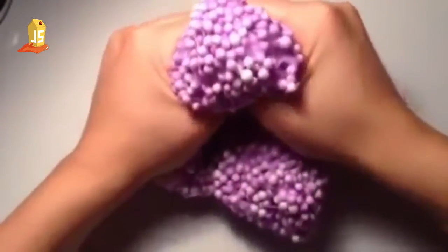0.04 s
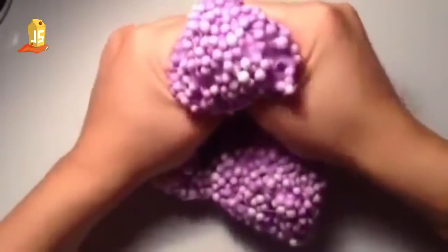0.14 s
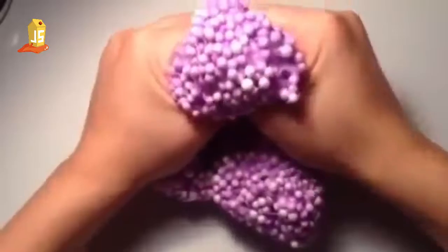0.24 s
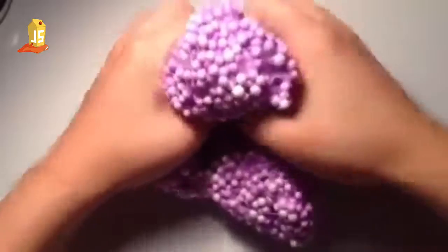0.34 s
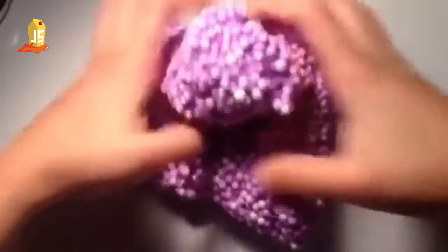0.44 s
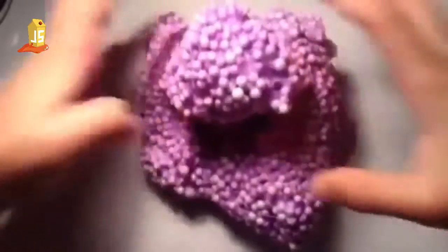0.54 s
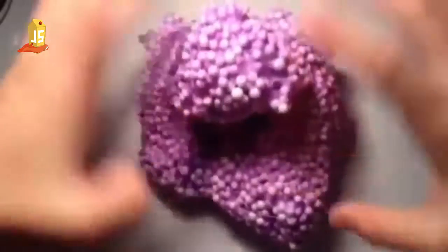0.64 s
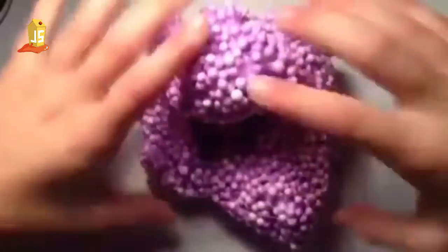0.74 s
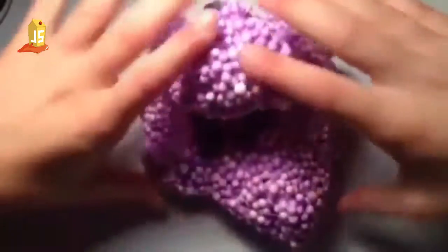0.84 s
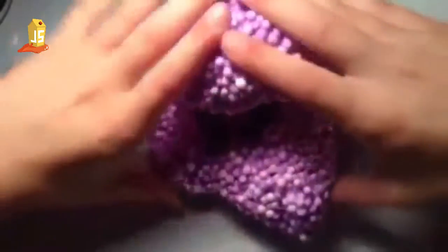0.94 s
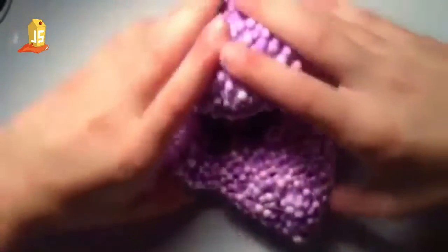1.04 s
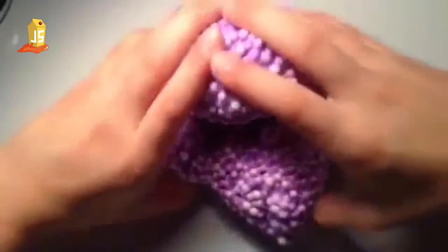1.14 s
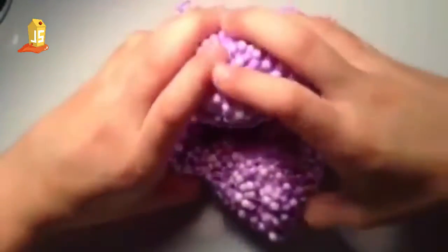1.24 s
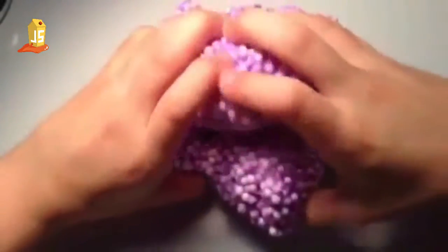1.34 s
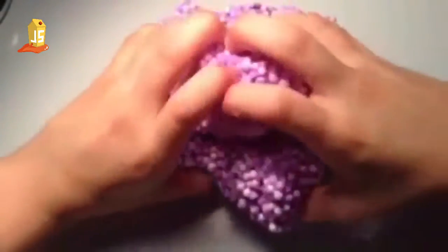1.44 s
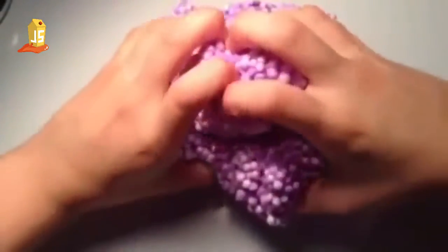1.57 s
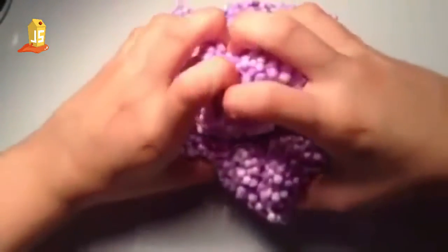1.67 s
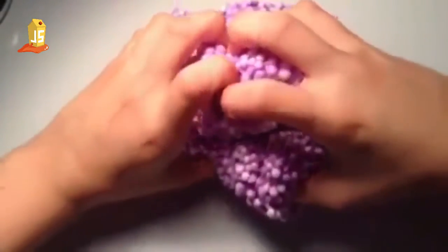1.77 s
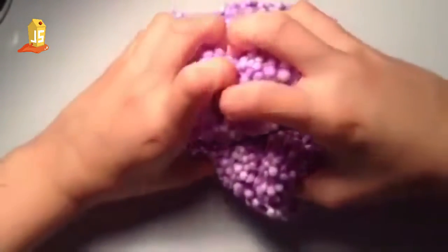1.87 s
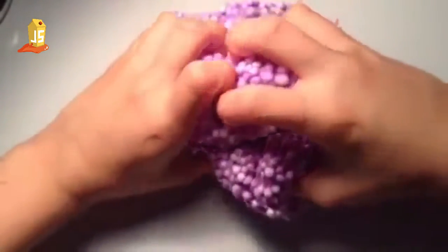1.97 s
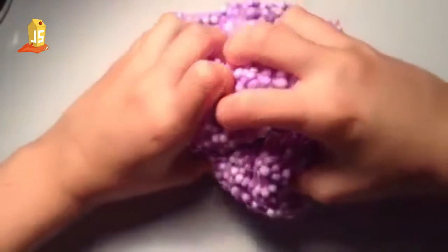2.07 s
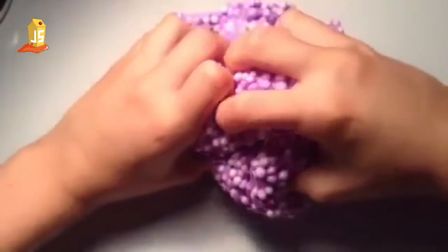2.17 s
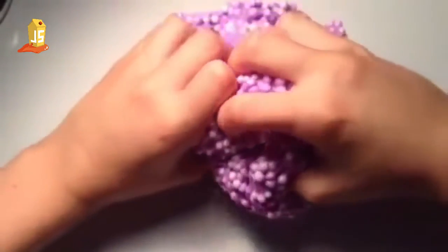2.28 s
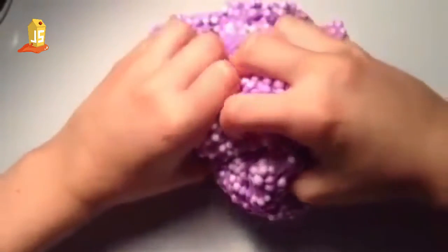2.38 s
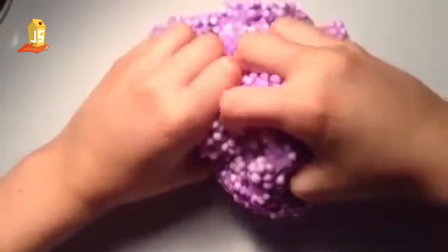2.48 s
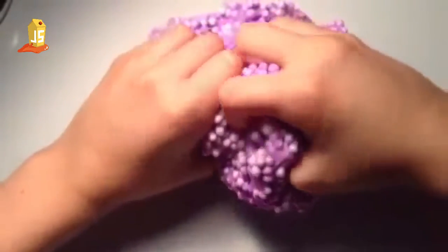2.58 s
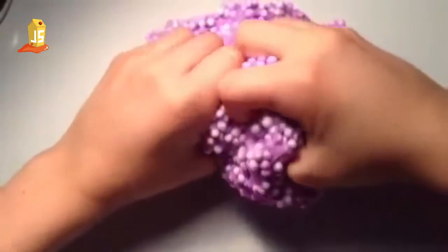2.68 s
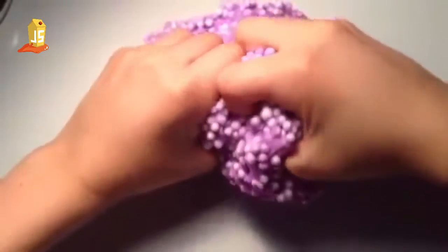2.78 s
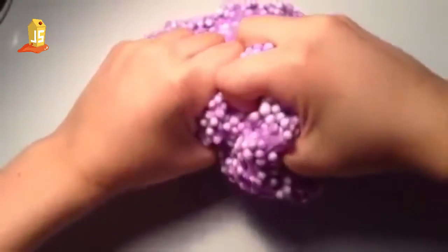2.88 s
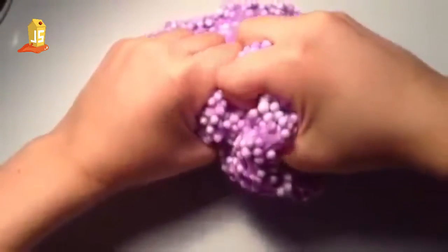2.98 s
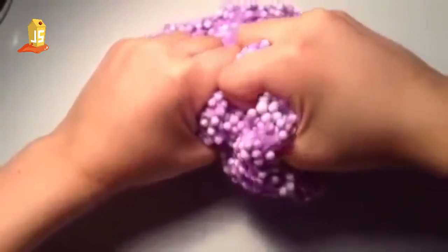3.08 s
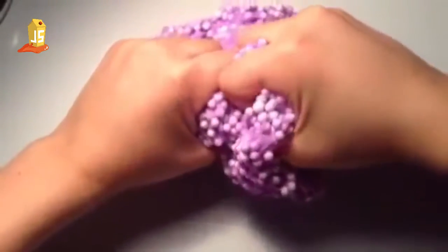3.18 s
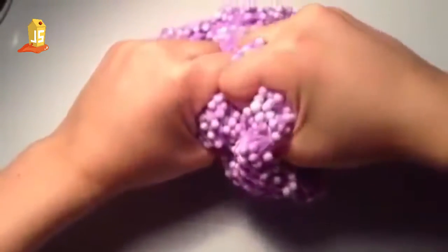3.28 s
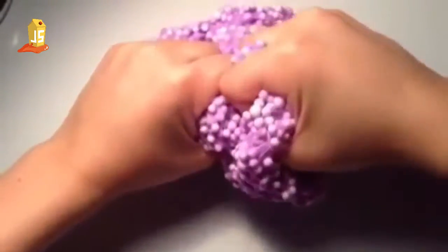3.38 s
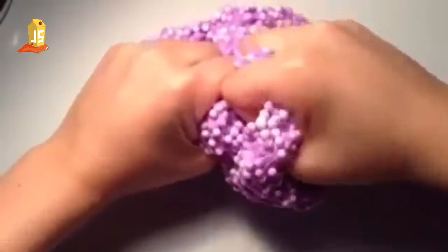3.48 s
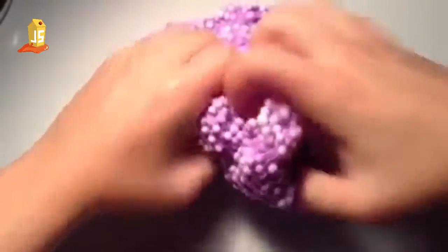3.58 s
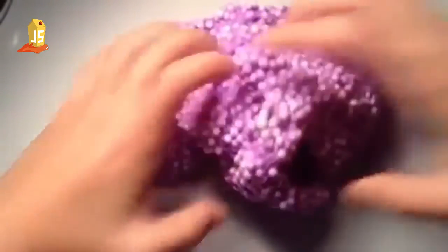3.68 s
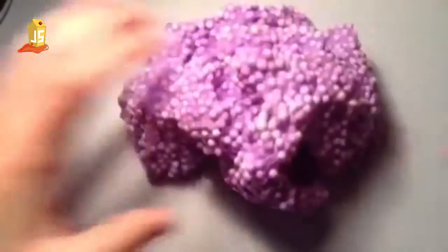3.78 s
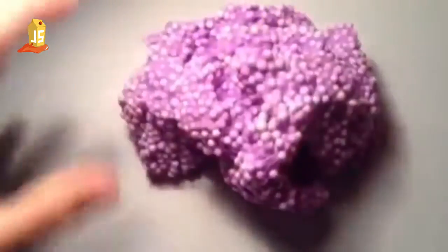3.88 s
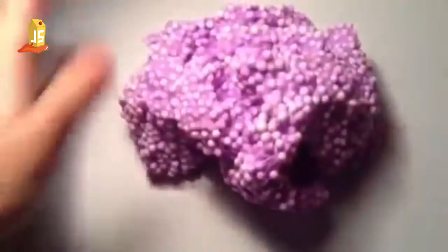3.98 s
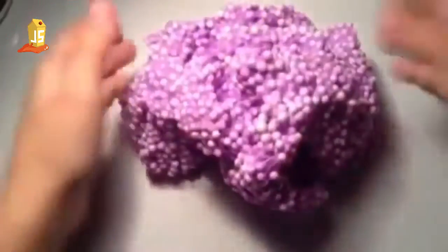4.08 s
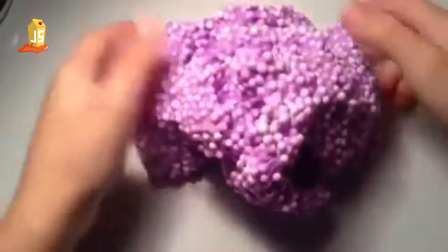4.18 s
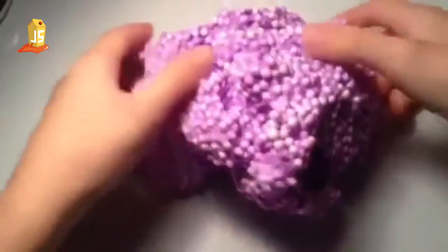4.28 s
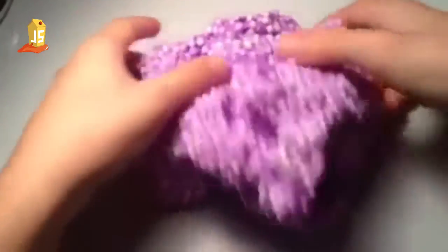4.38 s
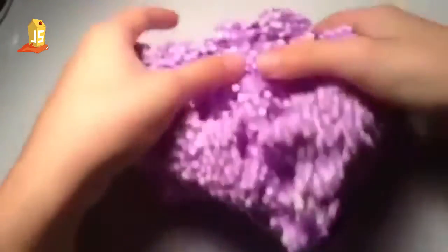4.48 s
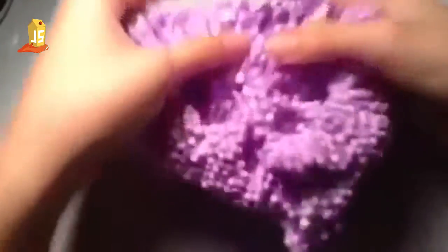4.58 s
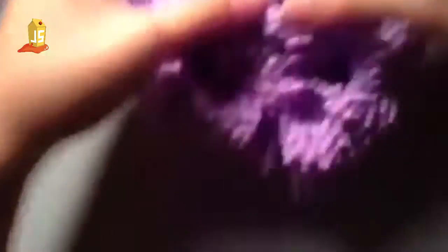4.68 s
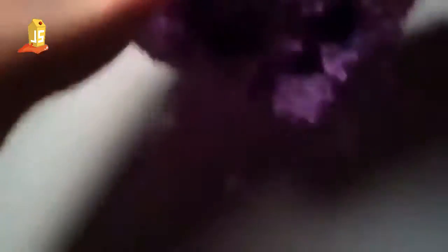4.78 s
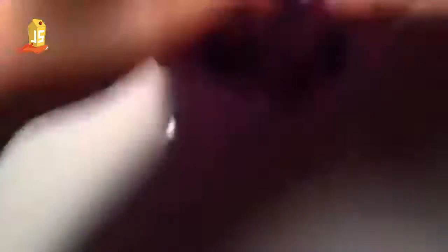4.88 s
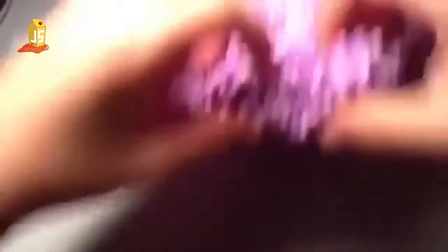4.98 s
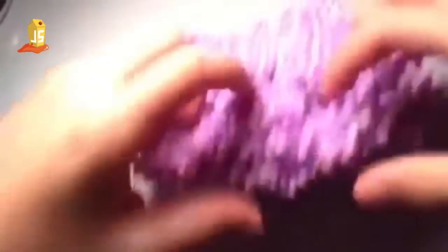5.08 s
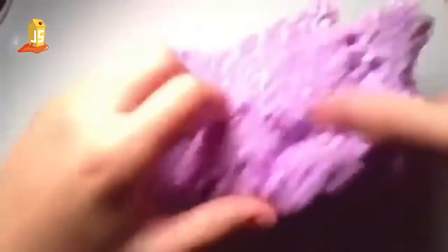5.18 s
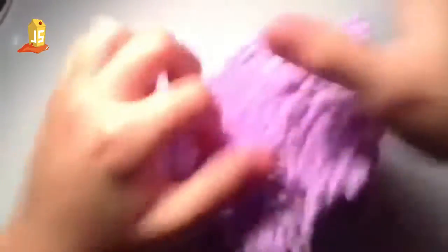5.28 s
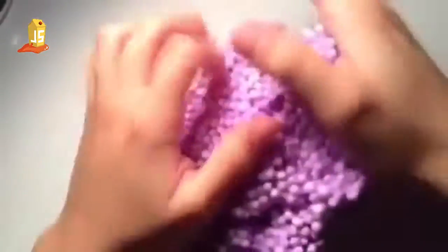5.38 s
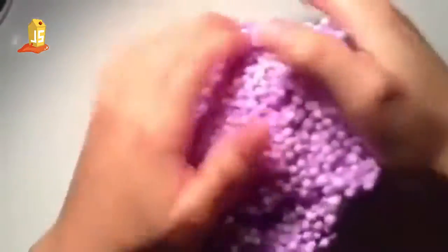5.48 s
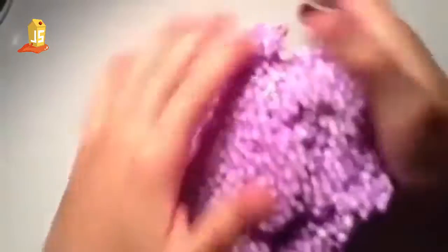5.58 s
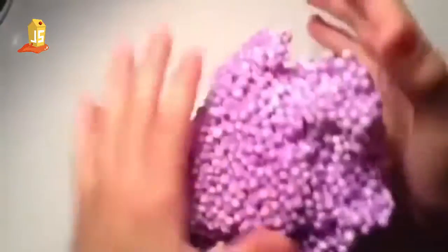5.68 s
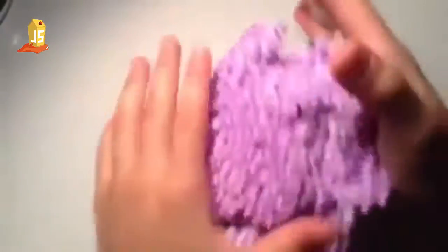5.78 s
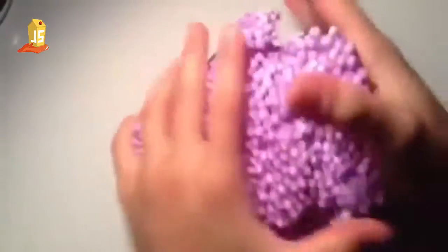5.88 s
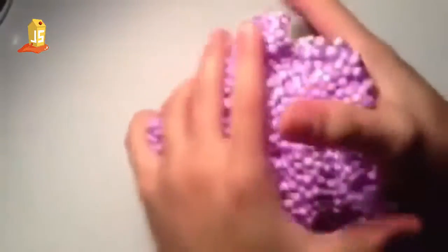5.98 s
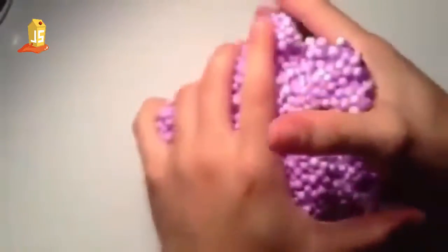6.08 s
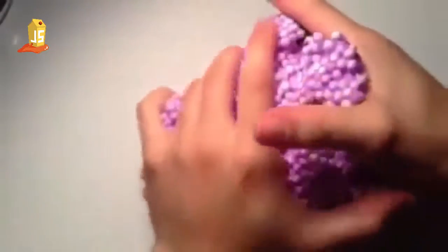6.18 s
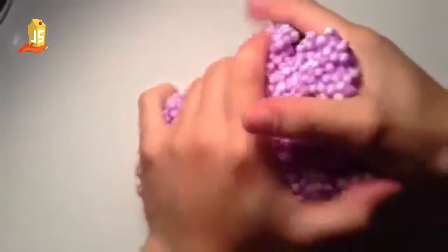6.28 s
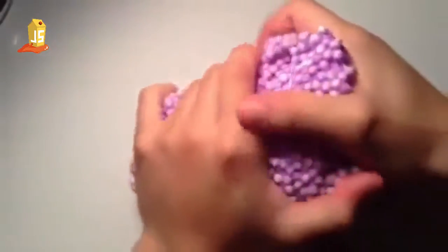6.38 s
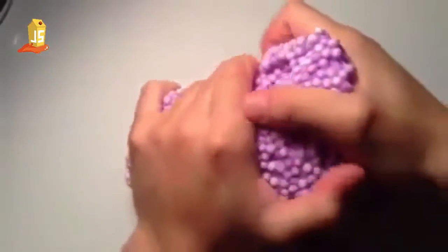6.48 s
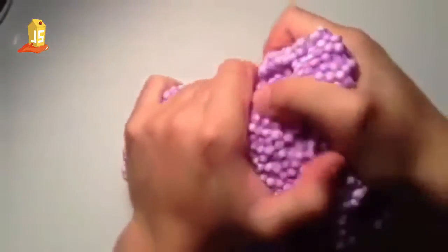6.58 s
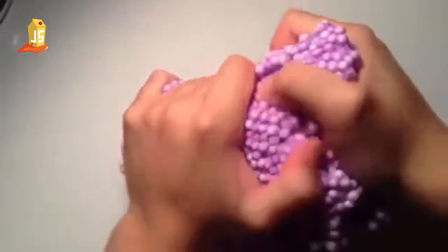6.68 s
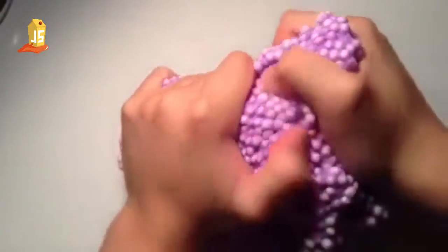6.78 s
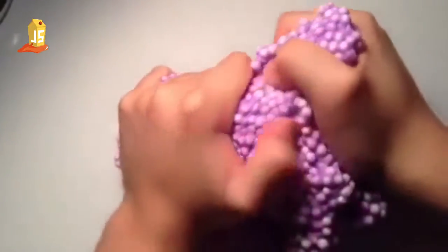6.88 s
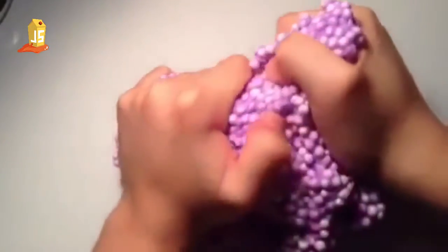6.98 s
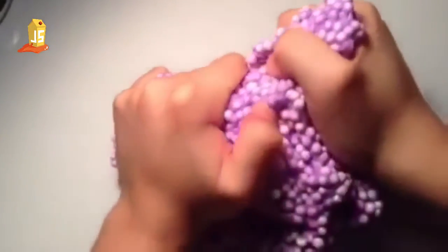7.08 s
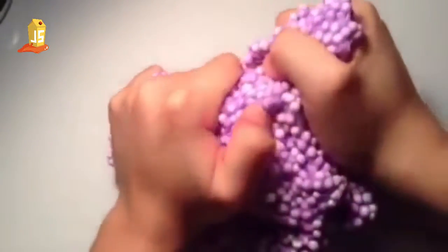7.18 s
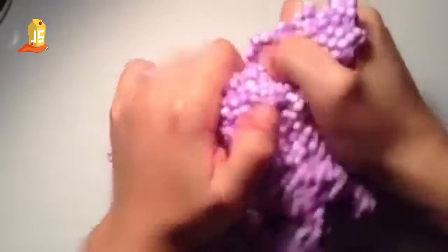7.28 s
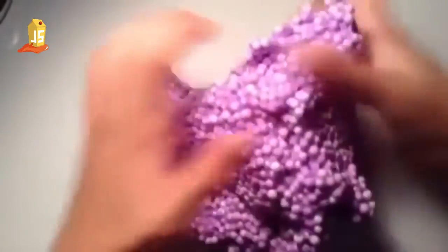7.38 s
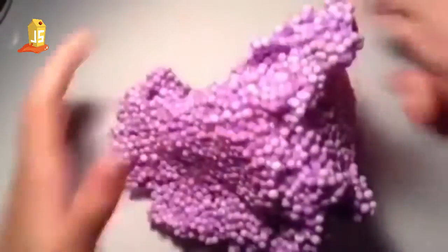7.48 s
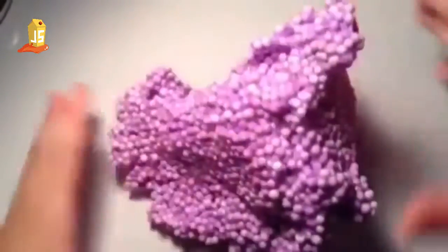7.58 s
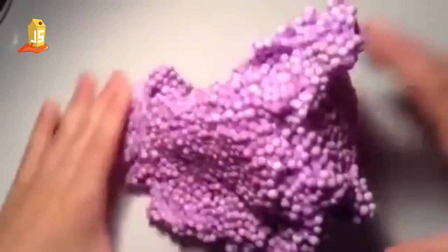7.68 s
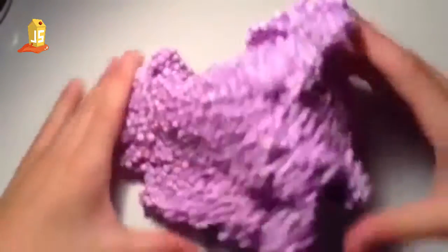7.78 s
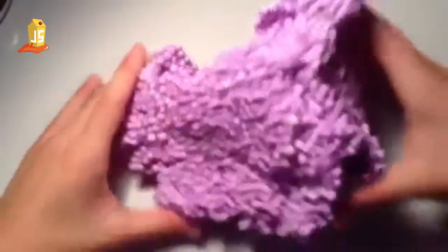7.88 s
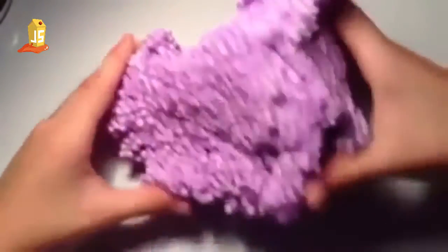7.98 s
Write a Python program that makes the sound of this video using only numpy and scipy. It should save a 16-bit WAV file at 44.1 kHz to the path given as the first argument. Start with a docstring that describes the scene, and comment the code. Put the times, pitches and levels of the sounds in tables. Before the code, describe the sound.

Two hands press a lump of tiny beads in sticky slime on a table. Short wet rips come first, then slowly growing crackles with bright snaps, easing off to a pause. A dull double thump and faint handling follow, then a sudden crisp crunch, dying to ticks. Close, dry, mono sound over a faint low room hum.

```python
"""Foam-bead slime crackles as two hands knead it on a table: beads unstick in random band-passed ticks. Trapped
air pockets pop sharply and wet bubbles ring briefly, both as decaying sinusoids near the hands. The table thuds
softly as a sum of damped modes when the lump is pressed, dropped or turned over. Faint tones sound briefly,
some gliding. The small, quiet room adds a short tail and a low, shaped noise."""
import sys
import numpy as np
from scipy import signal
from scipy.fft import rfft, irfft, next_fast_len
from scipy.io import wavfile
from scipy.ndimage import uniform_filter1d, map_coordinates

SR = 44100
rng = np.random.default_rng(int(sys.argv[2]) if len(sys.argv) > 2 else 0)


def wrap_up_sound(samples):
    """Save the sound to the file named by the first command line argument, as 16-bit audio."""
    columns = np.atleast_2d(samples).T
    # keep every value between -1 and 1, then stretch to whole-number steps
    tamed = np.clip(columns, -1, 1)
    steps = np.round(tamed * 32767).astype(np.int16)
    wavfile.write(sys.argv[1], SR, steps)


N = 354563
TIME = np.arange(N) / SR

# colour of the crackle: (frequency [Hz], relative spectral density [dB])
CRACKLE_COLOUR = [(200, -14.5), (340, -18), (470, -10), (640, -3.5), (900, -2.5), (1650, 1), (5000, 5),
                  (11500, 3.5)]


def crackle(squelch, beads, per_s, more_per_db, size_db, clump_db, narrow_db,
            scatter_db, scatter_t60, squelch_db, beads_db):
    """Stochastic impulse emission: beads unstick in ticks of random pitch, more often under a harder squeeze."""
    squelch = squelch + squelch_db
    beads = beads + beads_db
    rate = per_s * from_db(more_per_db * (beads - beads.max()))
    at = np.flatnonzero(rng.random(N) < rate / SR)

    # the wandering size gathers the ticks into small avalanches
    all_sizes_db = size_db * np.minimum(rng.exponential(1, N), 5) + clump_db * drift(180)
    sizes = from_db(all_sizes_db)[at]
    pitches = np.exp(rng.uniform(np.log(300), np.log(16000), N))[at]

    out = np.zeros(N)
    edges = np.geomspace(150, 13500, 15)
    for low, high in zip(edges, edges[1:]):
        hz = np.sqrt(low * high)
        octaves_away = np.abs(np.log2(hz / pitches))
        signs = rng.choice([-1, 1], N)[at]
        ticks = np.zeros(N)
        ticks[at] = sizes * from_db(-narrow_db * octaves_away) * signs
        ticks += from_db(scatter_db) * scatter(ticks, scatter_t60)
        # even out the running power, so that the hands set the strength of each stretch
        ticks /= np.sqrt(np.abs(uniform_filter1d(ticks ** 2, size=3000)) + 1e-9)
        # low ticks are wet slime, high ones dry beads
        dry_share = np.clip(np.log(hz / 1500) / np.log(6000 / 1500), 0, 1)
        level = (1 - dry_share) * squelch + dry_share * beads + at_hz(CRACKLE_COLOUR, hz)
        out += butter(ticks * from_db(level), [low, high], "band")
    return out


def scatter(x, t60):
    """Diffuse reflection: each tick starts a fresh noise of equal energy that decays exponentially."""
    keep = from_db(-120 / (t60 * SR))   # acts on power, hence 120
    power = signal.lfilter([0, 1 - keep], [1, -keep], x ** 2 + 1e-24)
    return np.sqrt(power) * rng.standard_normal(N)


GRIP_DB_PER_S, SETTLE_DB_PER_S = 23, 15   # growth as the grip closes, decay under the held hands
SQUELCH_FOLLOWS = 0.659   # share of that swing in the wet squelch
LET_GO_DB_PER_S = 297.5   # fade before the touch and after letting go
REST_SQUELCH_DB, REST_BEADS_DB = -79.5, -77.5   # relative levels of the lump under resting fingers
FITS_PER_S, FITS_DB = 29, 1.4933   # the beads give way in fits and starts
STALL_S = 0.029   # time of the drop when the lump stops giving
AWAY_DROP_DB = 13   # the resting rustle sinks by this much
DRYING_DB_PER_S = 4.5   # under a closed grip the air runs out and the squelch fades
# long squeezes: (fingers touch [s], grip closed [s], lump stops giving [s], let go [s],
#   relative wet squelch [dB], relative bead crackle at full grip [dB], drop when it stops giving [dB])
LONG_SQUEEZES = [(1.092, 1.999, 2.84, 3.50, -55, -46, 8), (6.01, 6.253, 6.815, 7.27, -49.5, -38, 12)]
# nothing touches the lump: (from [s], to [s]); a row that ends before it starts has no effect
UNTOUCHED_SPANS = [(3.72, 4.27), (7.5, 6.4)]


def squeezing():
    """Power summation: long squeezes add to the resting lump, giving squelch and bead levels in dB."""
    inside = sum(1.0 * (TIME > start) * (TIME < end) for start, end in UNTOUCHED_SPANS)
    away = uniform_filter1d(inside, size=2000)
    rest_db = np.array([[REST_SQUELCH_DB], [REST_BEADS_DB]])
    power = from_db(rest_db - AWAY_DROP_DB * away) ** 2
    for touch, closed, stall, let_go, squelch_db, beads_db, stall_db in LONG_SQUEEZES:
        held = np.maximum(TIME - stall, 0)
        slack = GRIP_DB_PER_S * np.maximum(closed - TIME, 0)
        slack += stall_db * np.minimum(held / STALL_S, 1) + SETTLE_DB_PER_S * held
        slack += FITS_DB * drift(FITS_PER_S)
        dried = DRYING_DB_PER_S * np.maximum(TIME - closed, 0)
        hands_off = LET_GO_DB_PER_S * np.abs(TIME - np.clip(TIME, touch, let_go))
        squelch = squelch_db - SQUELCH_FOLLOWS * slack - dried - hands_off
        beads = beads_db - slack - hands_off
        power += from_db([squelch, beads]) ** 2
    return 10 * np.log10(power)


TOUCH_FADE_DB = 8.5   # asymptotic slope per half length, either side of a touch
# brief touches, as the hands peel off, grab, shift or turn the lump:
#   (time [s], relative wet squelch [dB], relative bead crackle [dB], half length [s])
BRIEF_TOUCHES = [(0.058, -54.5, -54.5, .042), (0.158, -63, -58.5, 0.066), (0.343, -42.5, -43, .027),
                 (0.364, -38, -44.5, 0.0048), (0.399, -44.5, -42.5, 0.023), (.507, -67.5, -72, .06),
                 (1.47, -63, -65.5, 0.0834), (2.308, -47, -44, 0.00714), (3.293, -57.5, -53, .03),
                 (3.559, -49, -47, 0.033), (3.627, -57, -50.5, .027), (4.307, -58, -67, 0.0143),
                 (4.394, -50, -57.5, 0.01915), (4.528, -65.5, -64.5, .056), (4.717, -66.5, -58.5, 0.022),
                 (4.856, -71.5, -62, 0.0265), (4.974, -60, -57, 0.0171), (5.05, -69.5, -62, 0.024),
                 (5.303, -62.5, -65.5, 0.0297), (5.388, -61, -55.5, 0.0169), (5.548, -67, -67, 0.0406),
                 (5.874, -52, -48, 0.0162), (5.924, -59, -55.5, 0.027), (7.318, -51, -46.5, 0.02604),
                 (7.968, -63, -58, .021)]


def touching():
    """Power summation: brief touches add as rounded swells, giving squelch and bead levels in dB."""
    power = np.zeros((2, N))
    for s, squelch_db, beads_db, half_s in BRIEF_TOUCHES:
        half_lengths = np.minimum(np.abs(TIME - s) / half_s, 20)
        swell = from_db(-TOUCH_FADE_DB * (np.hypot(1, half_lengths) - 1))
        power += (from_db([[squelch_db], [beads_db]]) * swell) ** 2
    return 10 * np.log10(power)


def cupped_hands(x, delay_s, wander, reflected, per_s):
    """Comb filtering: two moving palms reflect the crackle, and its hollow colour keeps shifting."""
    out = x
    for palm in range(2):
        lag = delay_s * (palm + 1) * np.exp(wander * drift(per_s))
        out = out + reflected * map_coordinates(x, [(TIME - lag) * SR], order=3)
    return out / np.sqrt(1 + 2 * reflected ** 2)


# large air pockets bursting: (time [s], relative level over the first ms [dB], pitch [Hz])
LARGE_POPS = [(.3564, -26.5, 1550), (.4343, -26.5, 6450), (.647, -39.5, 3220), (.9332, -42, 2960),
              (.9466, -39.5, 2960), (1.0553, -34, 3070), (1.285, -43.5, 3190), (1.3713, -43.5, 1594),
              (1.4144, -33, 4950), (1.496, -43, 2110), (1.6052, -26.5, 3460), (1.745, -34, 6040),
              (1.8997, -33, 4000), (1.9252, -37.5, 2260), (1.9999, -29.5, 5530), (2.0243, -36, 2170),
              (2.0899, -34.5, 1800), (2.1214, -31.5, 4940), (2.1381, -36, 1850), (2.1716, -39, 2870),
              (2.2868, -24.5, 8600), (2.417, -30, 4670), (2.497, -24.5, 7860), (2.565, -34.5, 3800),
              (2.5737, -21.5, 7250), (2.598, -31, 1964), (2.6272, -34.5, 2970), (2.6645, -31, 6500),
              (2.6736, -24.5, 4510), (2.7006, -22.5, 7400), (2.7252, -29, 5070), (2.7492, -27.5, 2130),
              (2.8201, -31.5, 5820), (2.9451, -16, 6200), (2.9745, -19.5, 9570), (2.9984, -30.5, 7700),
              (3.0073, -17.5, 9050), (3.0854, -24, 9480), (3.2117, -39.5, 3610), (3.2563, -27.5, 4640),
              (3.257, -29.5, 1612), (3.5497, -32, 5740), (3.8235, -50, 2463), (4.58, -41, 6812),
              (4.6457, -45, 3470), (4.7074, -35, 8950), (4.874, -42, 9450), (5.287, -46, 1583),
              (5.781, -42.5, 7700), (5.94, -32.5, 4240), (6.0312, -24.5, 1110), (6.1452, -35.5, 2040),
              (6.193, -33.5, 4640), (6.283, -20.5, 9680), (6.3101, -18.5, 10800), (6.37, -23, 2170),
              (6.3809, -18.5, 3900), (6.4005, -23, 8650), (6.4554, -24, 10450), (6.5079, -27, 5640),
              (6.5787, -27, 3700), (6.5957, -25.5, 4580), (6.6376, -30, 3320), (6.679, -33, 5590),
              (6.7455, -17.5, 5680), (6.7962, -25, 9350), (6.8107, -14, 8150), (6.8823, -35, 6880),
              (6.9325, -31.5, 6830), (6.9641, -36.5, 4020), (7.0576, -35, 8100), (7.1312, -36.5, 7295),
              (7.1994, -37, 3230), (7.3134, -25.5, 8040), (7.4243, -40, 5450), (7.4353, -37.5, 3762),
              (7.5708, -48.5, 2880), (7.725, -47, 1910), (7.94, -34, 8850), (7.9613, -38.5, 1690)]


def pops(pockets, cycles, scatter_t60, low_share, neighbour_db, level_db):
    """Damped oscillation: a burst pocket decays by 60 dB in a few cycles, then scatters off fingers and table."""
    out = np.zeros(N)
    t = TIME[:SR // 40]
    for s, db, hz in pockets:
        burst = np.cos(2 * np.pi * hz * t) * from_db(-60 * t * hz / cycles)
        burst = butter(burst, 300 + low_share * hz, "high")
        burst = butter(burst, 2 * hz, "low")
        reflections = dying_noise(scatter_t60)[:len(t)]
        scattered = energy_one(signal.fftconvolve(burst, reflections)[:len(t)])
        # dull pops lie deep in the lump, bright ones burst in the open
        buried = min(3500 / hz, 1.3)
        delayed = np.pad(scattered, (SR // 3000, 0))[:len(t)]
        pop = energy_one(burst) + buried * delayed
        size = from_db(db + level_db) * np.sqrt(SR / 1000)   # energy equal to this level held for 1 ms
        add(out, s, size * energy_one(pop))
        # a neighbouring pocket gives way a few ms before or after
        add(out, s + rng.normal(0, .002), size * from_db(neighbour_db) * scattered)
    return out


def small_pops(squelch, beads, per_s, more_per_db, over_db, spread_db, low_hz, high_hz):
    """Random point process: small pockets burst more often under a harder squeeze; rows as for large pops."""
    rate = per_s * from_db(more_per_db * (beads - beads.max()))
    at = np.flatnonzero(rng.random(N) < rate / SR)
    size, pitch = rng.random((2, N))[:, at]
    # dull pops follow the squelch, bright ones the beads
    db = (1 - pitch) * squelch[at] + pitch * beads[at] + over_db + spread_db * size
    return list(zip(at / SR, db, low_hz * (high_hz / low_hz) ** pitch))


def hollow(x, hz, width_hz, share):
    """Cavity resonance: the hollow between the fingers rings briefly after each pop."""
    return x + share * butter(x, [hz - width_hz / 2, hz + width_hz / 2], "band", order=1)


def squelches(effort, per_s, low_hz, octaves, cycles, size_db, level_db):
    """Bubble resonance: random small sources each ring at a pitch of their own and decay in a few cycles."""
    out = np.zeros(N)
    t = TIME[:SR // 30]
    at = np.flatnonzero(rng.random(N) < per_s / SR) / SR
    for when, (pitch, size) in zip(at, rng.random((len(at), 2))):
        hz = low_hz * 2 ** (octaves * pitch)
        onset = 1 - np.exp(-t * hz)
        bubble = np.sin(2 * np.pi * hz * t) * from_db(-60 * t * hz / cycles) * onset
        db = effort[int(when * SR)] + level_db - size_db * np.sqrt(size)
        add(out, when, bubble * from_db(db))
    return out


# table modes: (frequency [Hz], relative level [dB], 60 dB decay time [s])
TABLE_MODES = [(153.8, -7, 0.24), (262, -8.5, 0.22), (335, -15, 0.18), (499, -15.5, 0.32),
               (660, -14.5, 0.21), (1420, 7.5, 0.062)]
# hands and lump meeting the table:
#   (time [s], relative level [dB], time the push takes [s], upper limit of its excitation [Hz])
TABLE_THUDS = [(0.375, -45.5, 0.044, 270), (1.867, -52, 0.0058, 303), (3.565, -47, 0.0296, 266),
               (3.626, -43, 0.0344, 170), (4.058, -36.5, 0.00166, 394), (4.083, -30.5, 0.0082, 154.6),
               (4.377, -48.5, 0.045, 210), (4.939, -50.5, 0.0038, 227), (7.293, -52.5, 0.06, 260),
               (7.906, -54.5, 0.01, 179.3)]


def table(mush_db, mush_t60):
    """Modal excitation: a soft push swells slowly, a quick one starts abruptly; the lump adds a dull slap."""
    out = np.zeros(N)
    t = TIME[:SR // 2]
    hz, mode_db, t60 = np.transpose(TABLE_MODES)[:, :, None]
    for s, db, push_s, top_hz in TABLE_THUDS:
        swell = 1 - np.exp(-(t / push_s) ** 2)
        strength = from_db(mode_db) / np.sqrt(1 + (hz / top_hz) ** 4)
        # phase runs on scene time, so pushes in a row add to the same swing
        rings = np.sin(2 * np.pi * hz * (s + t)) * from_db(-60 * t / t60)
        mush = butter(rng.standard_normal(len(t)), 147, "high", order=4)
        mush = butter(mush, top_hz, "low", order=3)
        thud = (strength * rings).sum(axis=0) + mush * from_db(mush_db - 60 * t / mush_t60)
        envelope_peak = np.max(swell * from_db(-60 * t / t60[0]))
        add(out, s, from_db(db) * thud * swell / envelope_peak)
    return butter(out, 134, "high", order=10)


# faint tones, some gliding: (time [s], frequency [Hz], level before flutter [dB], half length to 1/e [s], glide
# [Hz/s])
FAINT_TONES = [(0.94, 694, -65.5, 0.064, 0), (1.125, 679, -70, 0.04, 3), (3.39, 1536, -67, 0.07, 0.5),
               (4.829, 262.5, -61, 0.037, 0.5), (5.552, 2550, -67, 0.034, -3500),
               (5.59, 1542, -70.5, 0.06, -600), (5.638, 2620, -68, 0.024, 2998)]


def faint_tones(wobble, flutter_db):
    """Unsteady tone: faint tones sing briefly, some gliding, all wavering."""
    out = np.zeros(N)
    for s, hz, db, half_s, glide in FAINT_TONES:
        frequency = hz * (1 + wobble * drift(80)) + glide * (TIME - s)
        phase = 2 * np.pi * np.cumsum(frequency) / SR
        swell = np.exp(-((TIME - s) / half_s) ** 2)
        out += from_db(db + flutter_db * drift(50)) * np.sin(phase) * swell
    return out


ROOM_T60_S = 0.17


def room(x, wet_db, wall_cut_hz):
    """Reverberation: convolution with decaying noise gives a short, faint tail from the walls."""
    tail = butter(dying_noise(ROOM_T60_S), wall_cut_hz, "low", order=1)
    tail = np.pad(tail, (SR // 250, 0))
    return x + from_db(wet_db) * signal.fftconvolve(x, tail)[:N]


ROOM_NOISE_DB = -70.5   # RMS level
# steady room noise: (frequency [Hz], relative spectral density [dB])
ROOM_NOISE_COLOUR = [(30, -25), (125, -21), (190, -1.5), (225, -10.5), (268, -7), (400, -18.5),
                     (700, -20.5), (8000, -29.5)]


def room_noise():
    """Spectral shaping: white noise weighted over frequency gives a low drone with a little hiss."""
    size = next_fast_len(N)
    hz = np.maximum(np.fft.rfftfreq(size, 1 / SR), 1)
    spectrum = rfft(rng.standard_normal(size)) * from_db(at_hz(ROOM_NOISE_COLOUR, hz))
    return from_db(ROOM_NOISE_DB) * rms_one(irfft(spectrum, size)[:N])


def dying_noise(t60):
    """Diffuse decay: a dense run of reflections falls exponentially, with total energy 1."""
    t = TIME[:SR // 2]
    return energy_one(rng.standard_normal(len(t)) * from_db(-60 * t / t60))


def drift(per_s):
    """Random modulation: straight lines join normal random values of spread 1."""
    knots = np.arange(0, TIME[-1] + 1, 1 / per_s)
    return np.interp(TIME, knots, rng.standard_normal(N)[:len(knots)])


def butter(x, hz, kind, order=2):
    """Butterworth filtering: the passband is maximally flat."""
    corners = np.clip(hz, 10, .45 * SR)
    sos = signal.butter(order, corners, kind, fs=SR, output="sos")
    return signal.sosfilt(sos, x + 1e-18)


def at_hz(points, hz):
    """Logarithmic frequency scale: table values are interpolated along log frequency."""
    known_hz, values = np.transpose(points)
    return np.interp(np.log(hz), np.log(known_hz), values)


def from_db(db):
    """Decibel law: 20 dB is a factor of ten in amplitude."""
    return 10 ** (np.asarray(db) / 20)


def rms_one(x):
    """Power normalisation: scales to an RMS of 1."""
    return x / np.sqrt(np.mean(x ** 2) + 1e-20)


def energy_one(x):
    """Energy normalisation: scales to a sum of squares of 1."""
    return x / np.sqrt(np.sum(x ** 2) + 1e-20)


def add(out, s, sound):
    """Superposition: mixes a sound in at time s."""
    start = max(round(s * SR), 0)
    out[start:start + len(sound)] += sound[:N - start]


def scene():
    """Superposition of sources: the kneaded lump in its room, the table, faint tones and the room's drone."""
    squelch, crunch = squeezing()
    touch_squelch, touch_crunch = touching()
    beads = crackle(squelch, crunch, per_s=2600, more_per_db=0.33, size_db=4.0, clump_db=2.5,
                    narrow_db=14, scatter_db=0.0, scatter_t60=0.041, squelch_db=11.0, beads_db=0.0)
    # skin peeling off the slime frees many beads at once: a denser, smoother crunch
    peeling = crackle(touch_squelch, touch_crunch, per_s=7500, more_per_db=.6, size_db=4.0, clump_db=0.0,
                      narrow_db=17.5, scatter_db=0.5, scatter_t60=0.044, squelch_db=11.0, beads_db=1.27)
    crackling = cupped_hands(beads + peeling, delay_s=.0014, wander=0.251, reflected=0.29, per_s=7)

    pockets = LARGE_POPS + small_pops(squelch, crunch, per_s=50, more_per_db=0.16, over_db=5.5,
                                      spread_db=9.0, low_hz=1490, high_hz=9000)
    bursts = pops(pockets, cycles=2.78, scatter_t60=0.015, low_share=0.3316, neighbour_db=-8, level_db=2.5)
    bursts = hollow(bursts, hz=2050, width_hz=220, share=0.45)

    # small wet bubbles give way among the beads
    bubbles = squelches(np.maximum(squelch, touch_squelch - 4), per_s=200, low_hz=995, octaves=1.6,
                        cycles=13, size_db=14.5, level_db=24.5)
    # single beads pull free of the slime with a short, higher ping
    pings = squelches(crunch, per_s=310, low_hz=2796, octaves=1.7, cycles=19, size_db=10.5, level_db=16.5)

    slime = room(crackling + bubbles + pings + bursts, wet_db=-12.5, wall_cut_hz=16000)
    thuds = table(mush_db=12.5, mush_t60=0.2)
    squeaks = faint_tones(wobble=.02, flutter_db=3.5)
    return slime + thuds + squeaks + room_noise()


CUTOFF_HZ = 12350


def record(dry):
    """Linear-phase low-pass filtering: the top is cut steeply."""
    lowpass = signal.firwin(121, CUTOFF_HZ, fs=SR)
    return signal.fftconvolve(dry, lowpass, "same")[None]


dry = scene()
out = record(dry)
wrap_up_sound(out)
```